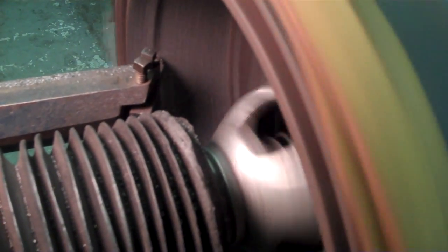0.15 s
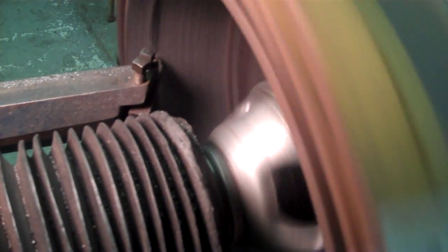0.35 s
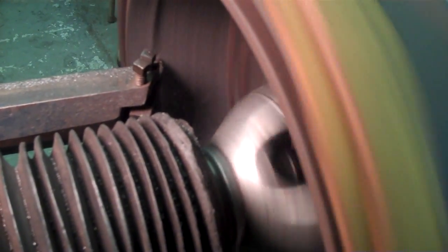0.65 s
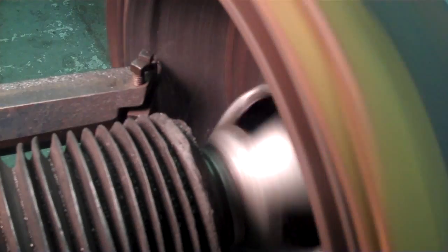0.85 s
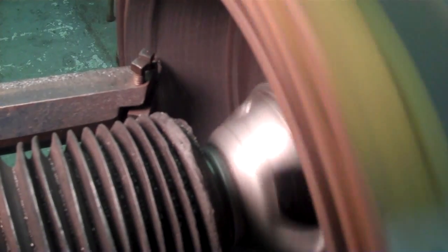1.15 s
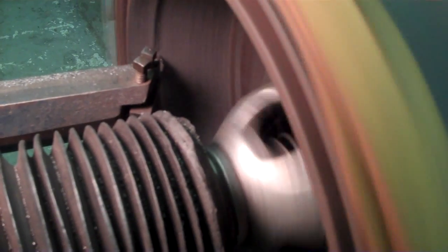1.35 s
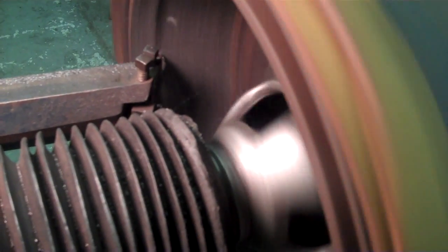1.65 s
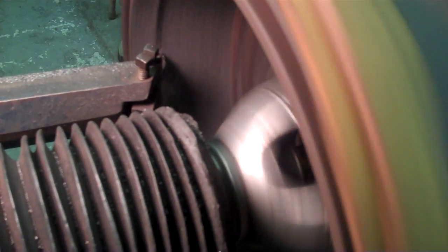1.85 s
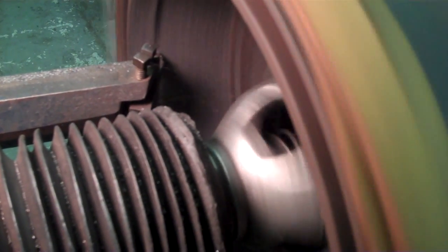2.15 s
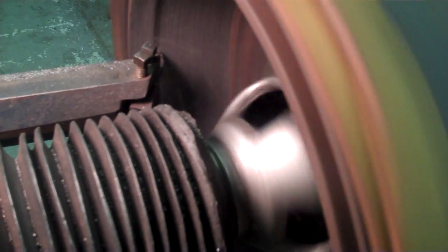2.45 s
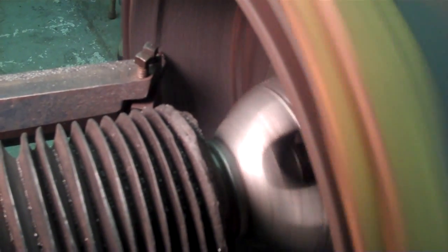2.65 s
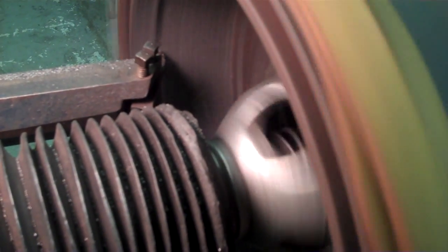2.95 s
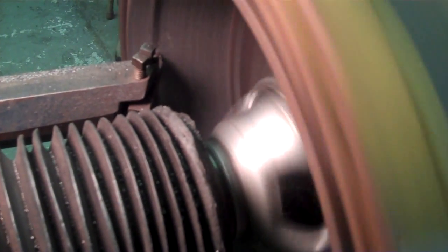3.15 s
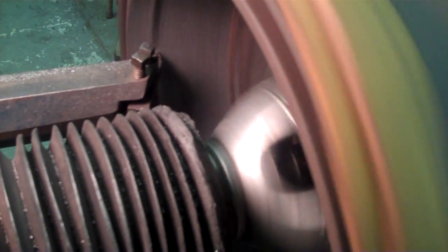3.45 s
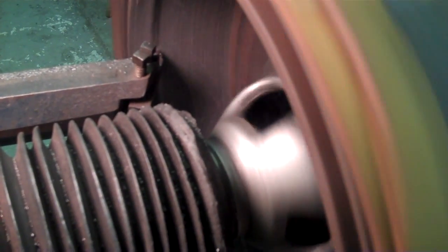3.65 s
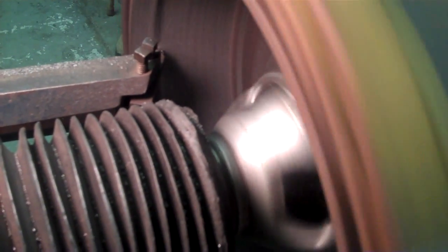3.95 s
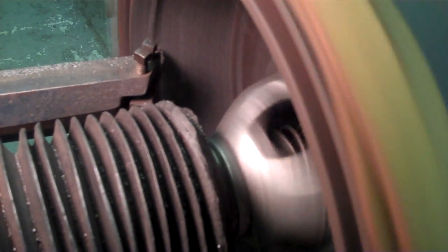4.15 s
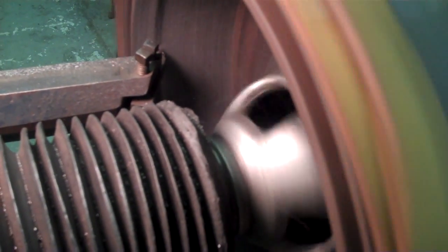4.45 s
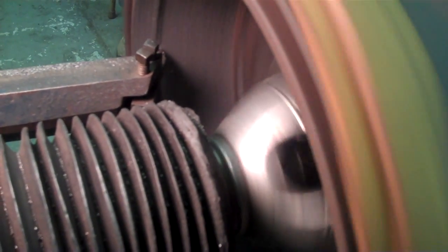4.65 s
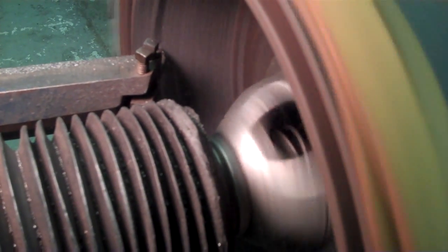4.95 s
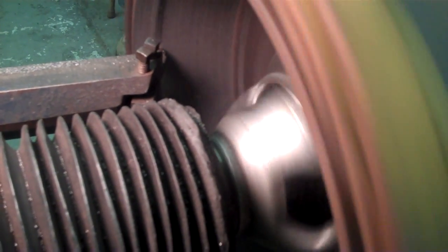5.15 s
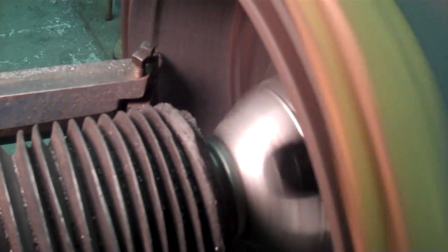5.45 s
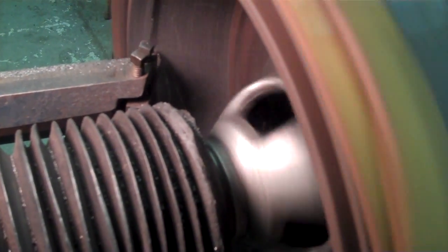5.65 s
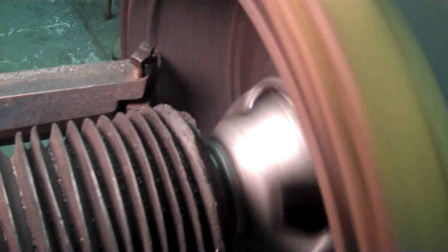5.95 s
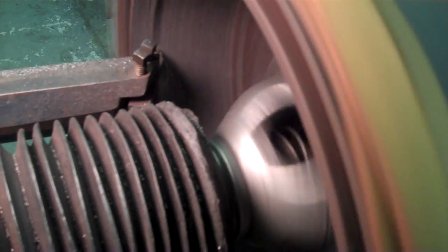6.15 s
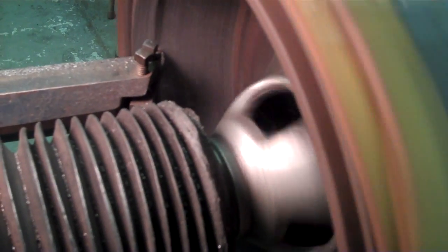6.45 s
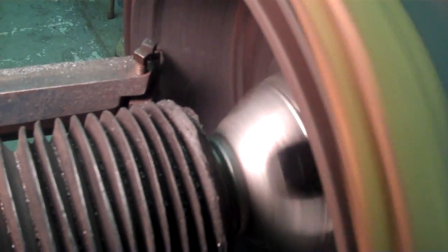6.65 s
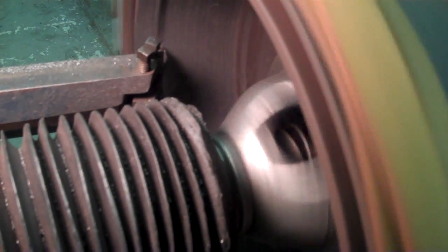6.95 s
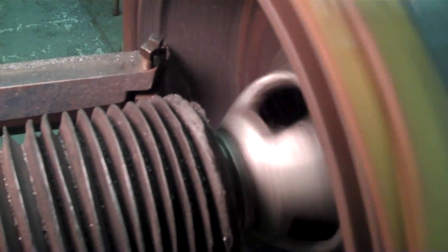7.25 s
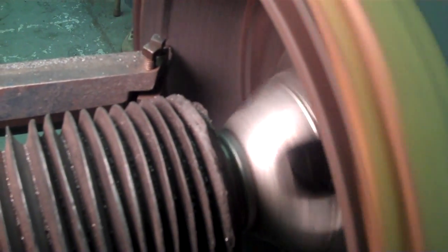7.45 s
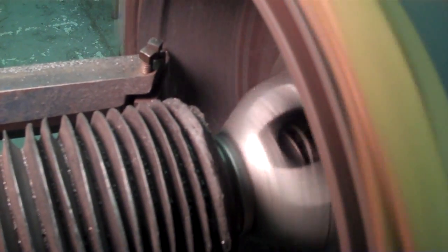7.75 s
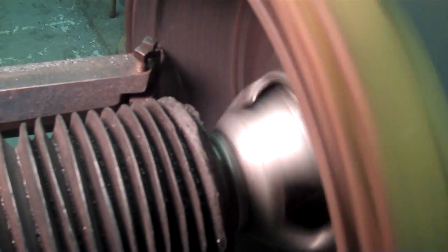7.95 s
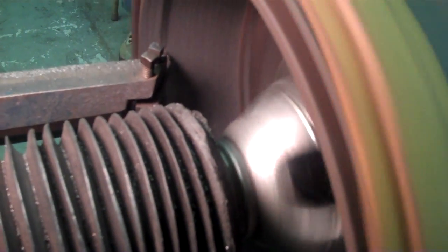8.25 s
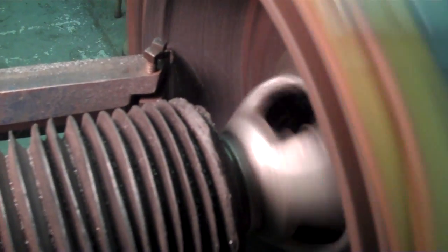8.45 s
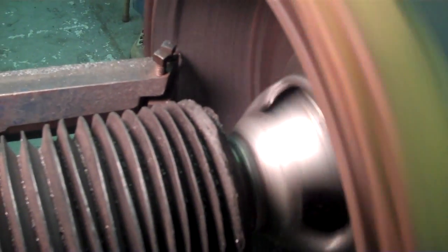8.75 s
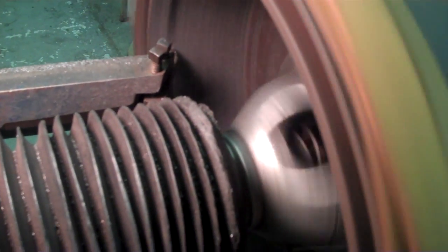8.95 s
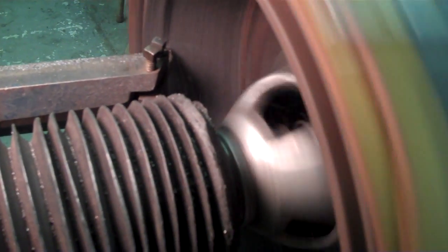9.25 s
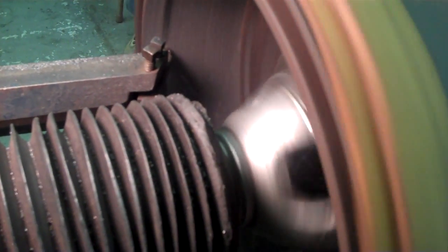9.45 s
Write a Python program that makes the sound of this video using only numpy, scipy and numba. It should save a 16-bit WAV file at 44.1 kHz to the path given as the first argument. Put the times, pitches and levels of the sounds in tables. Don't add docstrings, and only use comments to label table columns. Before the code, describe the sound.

From 0 seconds to the end, about 10 seconds, a lathe bit cuts a turning iron brake drum without pause. One turn takes about 0.8 seconds and brings two surges of harsh, gritty, ringing scrape, near 0.03 and 0.41 seconds, then repeating; each bites quickly, fades more slowly and dips before the next. The second dip is deeper. Dense inharmonic metallic ringing, strongest around 2.5 kHz and 7 to 9 kHz, flutters roughly with breaking chips amid broad hiss. Low motor hum and belt and gear rumble sway quietly beneath. Soft low air puffs hit mainly the left at about 0.1, 0.5, 1.4 and 2.1 seconds, then a close pair at 3.7. The rim's ringing gradually weakens while the shrill bit brightens slightly. Close, dry workshop sound; the highest treble is on the left, duller on the right.

```python
import sys
import numpy as np
from scipy import signal
from scipy.fft import rfft, irfft
from scipy.io import wavfile
from scipy.ndimage import uniform_filter1d
from numba import njit

SR = 44100
rng = np.random.default_rng(int(sys.argv[2]) if len(sys.argv) > 2 else 0)


def to_linear_factor(level_db):
    exponent = np.asarray(level_db, float) / 20
    return 10 ** exponent


def log_audio(samples):
    frames = np.atleast_2d(samples).T
    limited = np.clip(frames, -1, 1)
    pcm = np.round(limited * 32767).astype(np.int16)
    wavfile.write(sys.argv[1], SR, pcm)


N = 423360
STEP = 64
TURN_S = 0.8025
GRIT = rng.standard_normal(N)


def unit(x):
    return x / np.sqrt(np.mean(np.abs(x) ** 2))


def walk(rate_hz, size=N):
    hold = max(int(SR / rate_hz * size / N), 1)
    steps = rng.standard_normal(N // 32)[np.arange(size) // hold]
    return unit(uniform_filter1d(uniform_filter1d(steps, hold), hold))


# time into the turn in seconds, depth in dB.
RUNOUT = [
    (.03, 3),
    (.12, 1.0),
    (.19, -0.1),
    (.26, -3.5),
    (.41, 3),
    (.52, 1.0),
    (.6, -0.1),
    (.68, -5),
    (.77, 2),
]


def depth(lead_s=0):
    turn_s, depth_db = np.transpose(RUNOUT)
    return np.interp(np.arange(N) / SR + lead_s, turn_s, depth_db, period=TURN_S)


def flex(share, lead_s, ripple_db, peak_s, wander_db):
    ribs = np.cos(2 * np.pi * 6 * (np.arange(N) / SR - peak_s) / TURN_S)
    return share * depth(lead_s) + ripple_db * ribs + wander_db * walk(2.3)


def chip_force():
    return 0.7 * walk(25) + 0.71 * walk(150) + 0.93 * walk(900)


@njit
def add(out, swell, step, chips, grit, start, pole, ports):
    first = second = 0j
    for i in range(len(grit)):
        first = first * pole + swell[i // step] * chips[i] * grit[i - start]
        second = second * pole + first
        out[0, i] += (ports[0] * second).real
        out[1, i] += (ports[1] * second).real


def resonance(out, hz, width, ports, swell, chips):
    pole = np.exp((2j * np.pi * hz - np.pi * width) / SR)
    power = abs(pole) ** 2
    build_up = np.sqrt((1 + power) / (1 - power) ** 3 / 2)
    add(out, unit(swell), STEP, chips, GRIT, int(rng.integers(N)), pole, np.array(ports) / build_up)


# pitch in Hz, width
# in Hz, left level in dB, right level in dB, right port phase in radians, how closely it follows the cut
MODES = [(471, 51, -54.5, -55.5, 0.0, 0.4), (559, 86, -50.3, -51.5, -0.1, 0.3),
         (700, 40, -46, -47.6, -0.1, 0.5), (728, 26, -40.3, -41.9, -0.1, 0.5),
         (775, 55, -43, -45, -0.2, 0.5), (865, 50, -52, -53.5, -0.2, 0.5),
         (972, 37, -53.1, -54.2, -0.7, 0.4), (1070, 24, -47.5, -47, -0.2, 0.5),
         (1121, 20, -52.5, -52, -0.2, 0.5), (1379, 126, -36.2, -34.4, 0.2, 0.4),
         (1528, 148, -44.6, -46.5, 0.4, 0.6), (2395, 49, -35.4, -36.4, 0.4, 0.4),
         (2451, 113, -30.3, -30.0, 0.1, 0.5), (2630, 75, -39.2, -38.3, 0.0, 0.9),
         (2818, 32, -38.6, -42.6, -0.7, 0.8), (3142, 71, -43.5, -43.5, -0.5, 1.0),
         (3426, 117, -32.2, -35.5, -0.2, 0.7), (3745, 302, -34.5, -35.8, -0.4, 0.8),
         (3943, 64, -34.9, -34.6, -1.1, 1.1),
         (4639, 449, -35.7, -44.0, -0.1, 0.7), (4820, 163, -46.3, -32.1, -2.0, 0.8),
             (5060, 194, -38.4, -45.2, -0.6, 0.8), (5292, 133, -42.2, -35.0, 0.6, 0.7),
             (5713, 146, -33.6, -31.4, 0.7, 1.0), (5974, 253, -34.4, -29.1, -1.9, 0.9),
             (6212, 449, -36.6, -33.4, 2.2, 0.8), (6534, 115, -47.2, -35.0, -0.9, 0.9),
             (6668, 228, -33.6, -47.8, -0.7, 1.0), (6890, 172, -33.5, -31.0, -1.4, 1.2),
             (7157, 300, -26.2, -39.6, 1.6, 1.3), (7480, 70, -29.6, -46.7, 1.8, 0.9),
             (7780, 231, -24.6, -44.0, -0.5, 0.7),
         (8206, 354, -21.9, -43.0, -0.3, 1.3), (8376, 111, -21.7, -33.5, 2.5, 1.2),
             (8551, 135, -22.0, -35.6, 0.9, 1.1), (8805, 204, -31.3, -43.4, 1.5, 0.8),
             (9053, 207, -32.4, -71.8, 2.1, 0.8), (9564, 184, -31.5, -66.8, 2.0, 1.1),
             (9729, 281, -51.0, -44.8, 2.6, 1.1), (10435, 449, -40.1, -61.5, -2.0, 1.1),
             (10800, 348, -41.0, -64.7, 1.8, 1.1),
         (11760, 449, -46.3, -74.9, 3.1, 1.2), (12129, 134, -44.0, -80.0, -3.2, 1.2),
             (12521, 177, -48.5, -79.7, 3.2, 1.2), (12878, 205, -48.9, -72.4, 0.5, 1.0),
             (13333, 187, -48.7, -69.8, -2.3, 0.9), (13721, 131, -52.4, -76.4, 2.1, 0.8),
             (13974, 134, -56.2, -80.0, -2.7, 0.8)]


def drum(rim_db, bar_db, web_db, slide_db, chips_db):
    out = np.zeros((2, N))
    chips = unit(to_linear_factor(chips_db))
    seconds = np.arange(N // STEP) * STEP / SR
    for hz, width, left_db, right_db, phase, follow in MODES:
        if hz < 900:
            depth_db = 2.1 * slide_db
        elif hz < 1800:
            depth_db = 2.9 * bar_db
        elif hz < 2550:
            depth_db = 2.8 * web_db
        else:
            depth_db = 1.12 * rim_db

        if hz < 4500:
            feed_db_s = 0
        elif hz < 7000:
            feed_db_s = -0.29
        else:
            feed_db_s = 0.1

        own_db = (1.7 if hz < 2550 else 1.3) * walk(11, size=N // STEP)
        swell = to_linear_factor(follow * depth_db[::STEP] + feed_db_s * seconds + own_db)
        ports = [to_linear_factor(left_db) + 0j, to_linear_factor(right_db) * np.exp(1j * phase)]
        resonance(out, hz, width, ports, swell, chips)
    return out * to_linear_factor(0.63)


# frequency in Hz, left level in dB per Hz, right level in dB per Hz.
HISS = [(60, -82.5, -84), (150, -78.5, -78), (289, -73, -74), (584, -73, -76.5), (990, -61.5, -68),
        (1720, -65, -67), (2980, -54.5, -57), (4050, -62, -60), (6150, -63.5, -63.5), (7850, -59.5, -63.5),
        (9200, -61, -82), (9950, -69.5, -106), (11570, -67.5, -142), (13900, -82, -110.0)]
# frequency in Hz, likeness (0-1).
ALIKE = [(60, 0.6), (300, 1), (1000, 0.7), (2600, 0.86), (4000, 0), (9000, 0.7)]
# frequency in Hz, width in Hz, gain in dB.
DIPS = [(932, 112, -12.5), (1222, 144, -13), (3010, 760, -9.5), (3070, 79, -9.5), (4125, 140, -8),
        (11320, 480, -8)]


def coloured(noise_pair, share):
    hz = np.maximum(np.arange(N // 2 + 1) * SR / N, 1)
    table_hz, *side_db = np.transpose(HISS)
    dips_db = sum(db / (1 + (2 * (hz - f) / w) ** 2) for f, w, db in DIPS)
    alike_hz, likeness = np.transpose(ALIKE)
    alike = np.clip(np.interp(np.log(hz), np.log(alike_hz), likeness), 0, 1)

    mid, side = rfft(noise_pair, axis=1) * share(hz)
    mid = mid * np.sqrt((1 + alike) / 2)
    side = side * np.sqrt((1 - alike) / 2)
    left_gain, right_gain = [
        to_linear_factor(np.interp(np.log(hz), np.log(table_hz), db) + dips_db) * np.sqrt(SR / 2) for db in side_db]
    return irfft(np.array([left_gain * (mid + side), right_gain * (mid - side)]), N, axis=1)


def chip_hiss(rim_db, chips_db):
    push = unit(to_linear_factor(1.05 * rim_db + chips_db))
    return coloured(push * rng.standard_normal((2, N)), lambda hz: 1 / np.sqrt(1 + (900 / hz) ** 2))


# time in seconds, peak in dB, swing rate in Hz, left minus right in dB.
PUFFS = [
    (0.0783, -26, 170, 28),
    (.462, -33, 220, 14),
    (0.545, -34, 170, 10),
    (1.368, -36, 200, 10),
    (2.069, -29, 200, 14),
    (3.693, -29.5, 170, 20),
    (3.709, -26, 150, 20),
]


def puffs():
    out = np.zeros((2, N))
    t = np.arange(SR // 50) / SR
    for s, peak_db, hz, pan_db in PUFFS:
        swing = (t - 0.01) * 2 * np.pi * hz
        spread = np.where(swing > 0, 2.5, 1)
        weight = np.where(swing > 0, 0.4, 1.1)
        puff = swing * np.exp(-swing ** 2 / 2 / spread) * weight
        start = int((s - 0.0055) * SR)
        out[:, start:start + len(t)] += to_linear_factor(peak_db + 5.0 - np.array([[0], [pan_db]])) * puff
    return out


# pitch in Hz, width in Hz, level in dB.
GEARBOX = [(205.8, 15.6, -55), (239, 19, -56.5), (366.2, 18.5, -55), (30, 6, -72)]
# pitch in Hz, level in dB.
MOTOR = [(76, -63), (119.5, -58), (150, -62)]


def machine():
    load_db = walk(3.97)
    noise = to_linear_factor(0.82 * load_db) * rng.standard_normal((2, N))
    rumble = coloured(noise, lambda hz: 1 / np.sqrt(1 + (hz / 900) ** 2))
    gears = np.zeros((2, N))
    for hz, width, db in GEARBOX:
        ports = [to_linear_factor(db) + 0j, to_linear_factor(db) * np.exp(0.4j)]
        resonance(gears, hz, width, ports, np.ones(N // STEP), np.ones(N))
    t = np.arange(N) / SR
    hum = sum(to_linear_factor(db) * np.sqrt(2) * np.sin(2 * np.pi * hz * t) for hz, db in MOTOR)
    balance = to_linear_factor(np.array([[1.2], [-1.2]]))
    return rumble + (gears + hum * to_linear_factor(load_db)) * balance


def scene():
    rim_db = depth() - 0.02 * walk(9)
    chips_db = chip_force()
    bar_db = flex(share=0.51, lead_s=0.036, ripple_db=1.85, peak_s=0.074, wander_db=0.19)
    web_db = flex(share=0.39, lead_s=0.028, ripple_db=0.76, peak_s=0.11, wander_db=0.48)
    slide_db = flex(share=0.54, lead_s=0.016, ripple_db=0.2, peak_s=0.097, wander_db=1)
    cutting = drum(rim_db, bar_db, web_db, slide_db, chips_db) + chip_hiss(rim_db, chips_db)
    return cutting + puffs() + machine()


def top_cut(x):
    return signal.sosfilt(signal.butter(12, 14120, fs=SR, output="sos"), x)


def record(dry):
    over = np.maximum(np.abs(dry) - 0.55, 0)
    left, right = dry - np.sign(dry) * (over - 0.4 * np.tanh(over / 0.4))
    shade = signal.cheby2(10, 16, 10400, fs=SR, output="sos")
    mix = np.array([left, signal.sosfiltfilt(shade, right)])
    return top_cut(mix)


dry = scene()
out = record(dry)
log_audio(out)
```